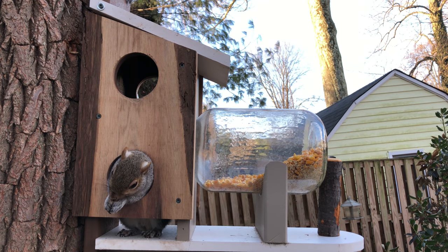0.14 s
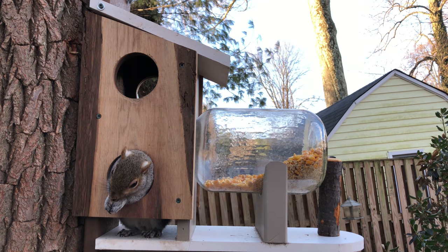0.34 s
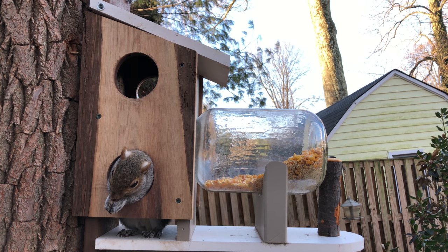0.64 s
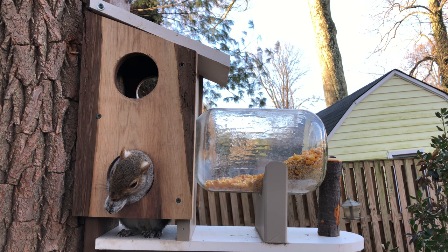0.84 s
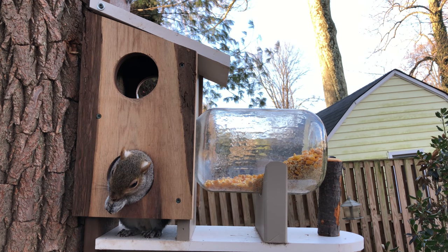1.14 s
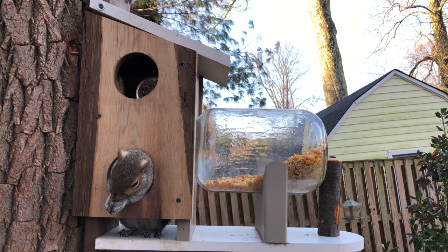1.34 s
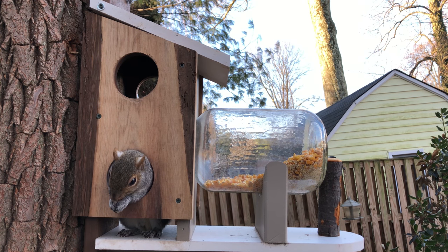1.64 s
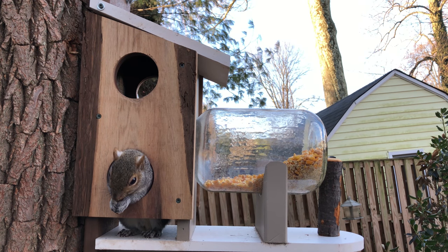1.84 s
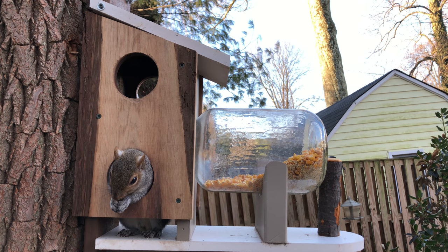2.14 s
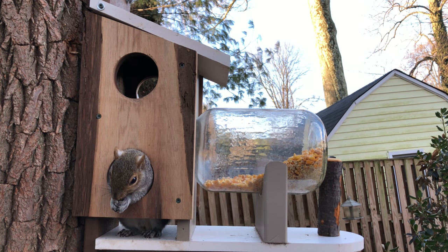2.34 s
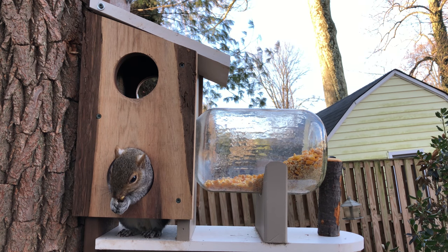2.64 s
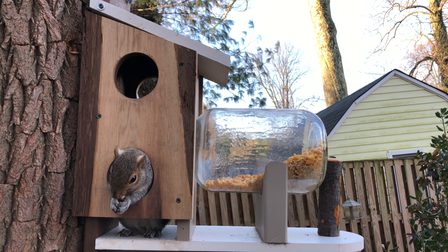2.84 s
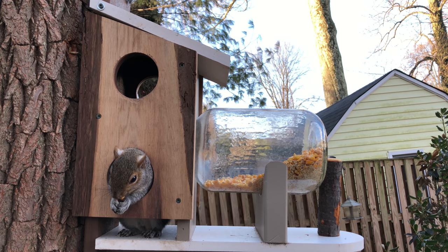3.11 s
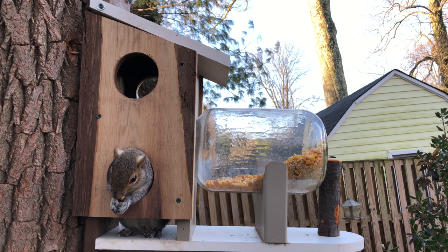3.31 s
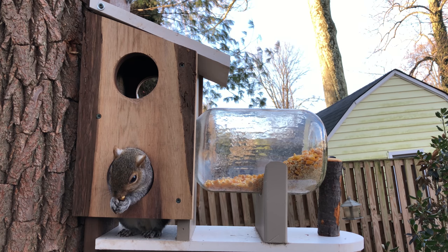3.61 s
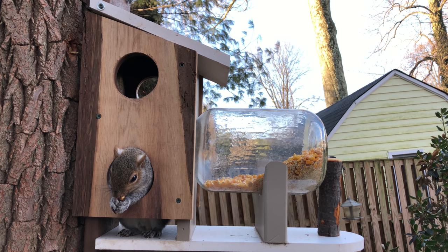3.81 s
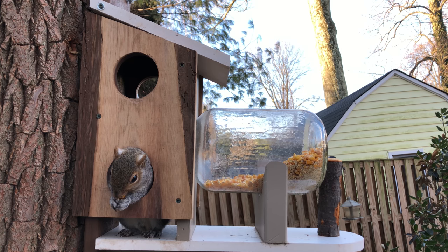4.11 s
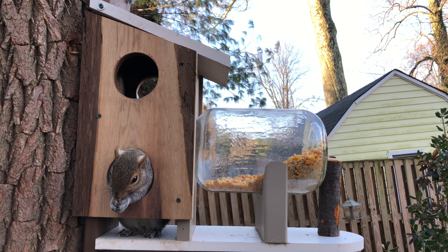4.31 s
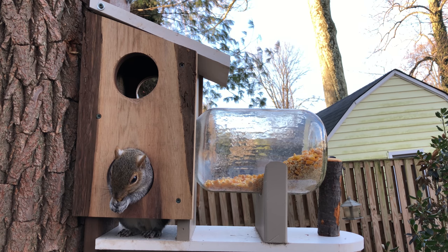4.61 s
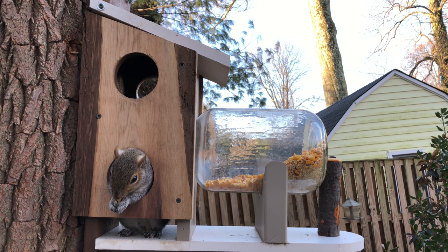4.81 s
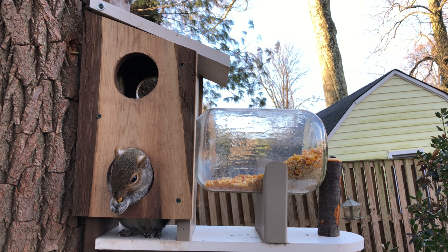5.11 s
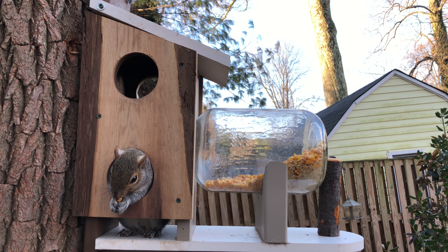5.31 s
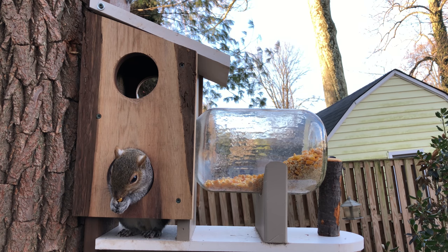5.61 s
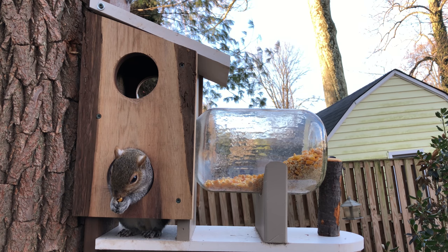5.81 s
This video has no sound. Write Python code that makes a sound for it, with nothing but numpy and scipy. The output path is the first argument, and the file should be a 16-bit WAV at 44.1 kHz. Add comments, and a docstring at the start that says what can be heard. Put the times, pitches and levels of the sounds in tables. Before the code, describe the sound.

A quiet backyard, heard with a squirrel very near the microphone gnawing dried corn at a wooden feeder. A low, fluctuating drone of a distant engine sits in soft town rumble with a thin airy hiss. From 0 to 2 s, faint small birds give rising slurs, quick chirps and thin high whistles, blurred by trees. The gnawing begins with light dry ticks and a clear crack at 0.8 s. From 1.7 to 2.5 s comes a dense burst of loud, brittle crunches, with tiny scrapes of teeth on hull. Then only faint nibbling clicks and a soft rustle remain, with a modest crack near 3.5 s and a high bird call at 3.3 s. Two sharp, isolated snaps strike at 4.4 and 4.6 s. Distant tyre noise swells towards 5 s and stays present; small ticks and a last faint buzzy bird call close at about 6 s.

```python
"""Squirrel gnawing dried corn

A squirrel gnaws dried corn close by, in the doorway of a wooden feeder in a back yard. Each bite is a
fracture: impulses ring the modes of the hard kernel and scatter off feeder, jar and trunk.
A far engine drones as a sum of multiples of its cycle; road, rumble and air are shaped noise, the road
swelling towards the end; small birds whistle in the trees as gliding sines."""
import sys
import numpy as np
from scipy import signal
from scipy.fft import rfft, irfft
from scipy.io import wavfile

SR = 44100
rng = np.random.default_rng(int(sys.argv[2]) if len(sys.argv) > 2 else 0)


def wav_out(sig):
    """Save sig, one row per channel (or a flat mono array), as 16-bit PCM at SR to the path in sys.argv[1]."""
    wavfile.write(sys.argv[1], SR, np.round(np.clip(np.atleast_2d(sig).T, -1, 1) * 32767).astype(np.int16))


N = 262395
TIME = np.arange(N) / SR  # seconds

# Noise spectra of the town rumble, the air, the road and the nearer car's tread.
# Each row: frequency in Hz, relative density in dB per Hz.
RUMBLE_SPECTRUM = [(25, -30.5), (45, 2.5), (80, 9), (140, 3), (250, -4.5), (350, -6), (500, -15.5),
                   (1000, -52)]
AIR_SPECTRUM = [(1500, 5.5), (3000, 4), (5000, 2.5), (8000, -3.5), (12500, -4), (14800, -13),
                (16000, -27.5)]
ROAD_SPECTRUM = [(200, -17), (480, 0), (800, 2), (950, -0.5), (1200, -0.5), (1800, -7), (2600, -12),
                 (3500, -19), (8000, -44)]
CAR_SPECTRUM = [(450, -27), (650, 3.5), (810, 6), (930, 3.5), (1180, 3), (1500, -6.5), (2000, -23.5),
                (2500, -7), (3200, -29.5)]
# Tyre noise from the road, and from one car that draws nearer. Each row: time in seconds, level in dB.
ROAD_LEVEL = [(0, -68), (2.6, -68), (4.4, -64), (4.92, -61), (5.3, -63.5), (5.95, -63.5)]
CAR_LEVEL = [(0, -85), (4.3, -82.5), (4.75, -66), (5.05, -65.5), (5.3, -67.5), (5.95, -63)]

# Speed of the far eight-cylinder engine. Each row: time in seconds, firing rate in Hz.
ENGINE_SPEED = [(0, 98.1), (0.3, 100.5), (0.7, 97.64), (2.7, 95.25), (3.2, 97.34), (3.5, 103.4), (4, 105.8),
                (5.2, 104.9), (5.95, 96.44)]
# Its firing tone and low exhaust throb, before a small trim. Each row: time in seconds, level in dB.
FIRING_LEVEL = [(0.0, -44.5), (0.38, -40), (1.41, -42), (1.77, -57), (1.84, -47), (2.2, -42.5), (2.67, -51),
                (2.95, -41.5), (3.18, -40), (3.83, -51), (4.01, -64), (4.11, -55), (4.99, -47.5),
                (5.15, -64), (5.29, -46), (5.44, -45.5), (5.57, -57.5), (5.95, -49.5)]
THROB_LEVEL = [(0.0, -46), (0.45, -47), (0.73, -59), (1.09, -50), (1.56, -63), (1.67, -50.5), (2.8, -58),
               (2.92, -68), (3.0, -62), (4.62, -57), (4.67, -62.5), (5.01, -49.5), (5.17, -70),
               (5.49, -48.5), (5.83, -70.5), (5.95, -58)]
# Its weaker lines. Each row: multiple of the engine cycle rate, usual level in dB.
ENGINE_ORDERS = [(10, -65.5), (11, -60), (13, -68), (14, -68.5), (16, -64), (19, -76.5), (21, -73.5),
                 (27, -83.5), (30, -81.5)]
# Course of the weaker lines about their usual level. Each row: time in seconds, change in dB.
ORDERS_LEVEL = [(0, 0), (0.75, 5), (1.9, 2), (2.3, -1), (3.5, -1.5), (5.95, -2)]

# Bird calls; levels are before the waver and the trees.
# Soft rising slurs of one bird. Each row: start in seconds, length in seconds, final pitch in Hz.
SLURS = [(0.393, 0.19, 2910), (0.605, .11, 2800), (0.936, 0.18, 2786), (1.281, 0.15, 2760),
         (1.617, .16, 2811), (1.958, 0.14, 2740)]
# Quick, rough upward chirps. Each row: start in seconds, length in seconds, level in dB, final pitch in Hz.
CHIRPS = [(0.114, 0.093, -79, 4350), (0.247, 0.064, -76, 4560), (0.52, 0.067, -81, 7326),
          (0.85, 0.061, -71, 3780), (1.081, .055, -72, 3670), (1.347, 0.1, -73, 3600),
          (2.489, 0.08, -75, 4000)]
# High buzzy calls that drop in pitch. Each row: start in seconds, length in seconds, level in dB.
SEEPS = [(1.247, 0.26, -84.5), (1.73, 0.14, -73.5), (3.275, 0.11, -75.5), (4.693, 0.026, -74),
         (5.611, 0.14, -75)]
# Thin whistles that settle on one high pitch.
# Each row: start in seconds, length in seconds, level in dB, height of the start above that pitch in Hz.
THIN_WHISTLES = [(0.0, 0.1, -74.5, 423), (0.254, 0.13, -78.5, 1110), (0.881, 0.214, -74, 70)]
# Long, slightly sagging notes of a far bird. Each row: start in seconds, length in seconds, final pitch in Hz.
HELD_NOTES = [(0.0, 0.22, 3690), (0.457, 0.49, 4120), (1.204, .36, 3850)]

# Modes that a crack rings, in four groups from dull to sharp.
# Each row: frequency in Hz, width of one resonance stage in Hz, strength in dB within its group.
BODY_MODES = [(756, 930, -8.5), (1455, 1780, -1), (2042, 1550, -3)]
RING_MODES = [(4220, 1200, -1), (4710, 770, 0.11)]
BRIGHT_MODES = [(5570, 4700, -0.62), (7540, 970, -0.078)]
TOP_MODES = [(10400, 2180, 0), (12010, 1470, -0.5), (14220, 1500, -6)]
# Soft rustles as the paws turn the kernel. Each row: centre in seconds, half length in seconds, level in dB.
RUSTLES = [(1.078, 0.029, -77), (3.562, 0.016, -76), (4.963, 0.014, -69.5)]
# Teeth scraping over the hull. Each row: start in seconds, length in seconds, level in dB.
SCRAPES = [(1.902, 0.013, -32), (2.078, 0.014, -37.5), (2.179, 0.017, -37), (2.282, 0.018, -46),
           (4.205, 0.011, -44)]
# Cracks of the kernel. Each row: time in seconds, level in dB, then the ring of the hull and the
# sharpness of the snap, both in dB about that level.
CRACKS = [(0.0784, -30, 6, -3), (0.344, -33, -8, -12), (0.6164, -36, 7.5, -2), (0.822, -15.5, -2, -11),
          (1.4233, -32, 5, -6), (1.7113, -7.5, -9.5, -12.5), (1.8164, -3.5, -15.5, -4),
          (1.8276, -8.5, -4, -0.5), (1.9043, -12.5, -8, -11), (1.91, -15, -7.5, 0.5),
          (1.9992, -8.5, -22, -12.5), (2.176, -14.5, -10, -15), (2.1806, -13.5, -18, -13),
          (2.186, -11.5, -30, -19), (2.2043, -12.5, -19, -9), (2.3229, -4, -10, -10),
          (2.328, -11.5, -4.5, -4), (2.4463, -2.5, -1.5, 2), (2.9178, -47, 5, 4), (3.1312, -38.5, 2.5, 3),
          (3.345, -39.5, 10.5, -1), (3.474, -25.5, -5, -14), (4.0449, -34.5, 7, 2), (4.1516, -43.5, 7, 15),
          (4.2041, -24, -23, -11), (4.405, 1, -4, -3), (4.6064, -1, -9, 4), (5.1067, -32.5, -4, -0.5),
          (5.3086, -40.5, 5.5, 6.5), (5.654, -39.5, 6.5, -3), (5.8176, -29, 2.5, -5)]


def from_db(db):
    """Amplitude ratio: 20 dB is a factor of ten."""
    return 10 ** (np.asarray(db) / 20)


def rms_one(x):
    """Normalisation: scale to unit rms."""
    return x / np.sqrt(np.mean(x ** 2) + 1e-20)


def curve(rows):
    """Linear interpolation: join (time, value) rows by straight lines."""
    seconds, values = np.transpose(rows)
    return np.interp(TIME, seconds, values)


def drift(rate):
    """Low-passed noise: smooth chance with about `rate` turns a second and unit spread."""
    step = 40  # samples between computed points
    pole = np.exp(-2 * np.pi * rate * step / SR)
    settle = 2000  # points dropped while the filter starts
    white = rng.standard_normal(N // step + settle + 2)
    slow = signal.lfilter([1], [1, -2 * pole, pole * pole], white)[settle:]
    return np.interp(np.arange(N) / step, np.arange(len(slow)), rms_one(slow))


def band(x, low_hz, high_hz, order=2):
    """Band limiting: a causal Butterworth band-pass."""
    edges = [low_hz, min(high_hz, 0.45 * SR)]
    sos = signal.butter(order, edges, "band", fs=SR, output="sos")
    return signal.sosfilt(sos, x + 1e-18)


def coloured_noise(spectrum):
    """Spectral shaping: steady noise of unit rms, weighted in frequency."""
    hz, db = np.transpose(spectrum)
    bins = np.maximum(np.fft.rfftfreq(N, 1 / SR), 1)
    skirt = np.minimum(bins / hz[0], 1) ** 2  # falls away below the first row
    gain = skirt * from_db(np.interp(np.log(bins), np.log(hz), db))
    return rms_one(irfft(rfft(rng.standard_normal(N)) * gain, N))


def resonance(x, hz, width_hz):
    """Damped oscillator: a two-pole resonance with gain 1 at its peak."""
    r = np.exp(-np.pi * width_hz / SR)
    numerator = [(1 - r * r) / 2, 0, (r * r - 1) / 2]
    denominator = [1, -2 * r * np.cos(2 * np.pi * hz / SR), r * r]
    return signal.lfilter(numerator, denominator, x + 1e-18)


def double_resonance(x, hz, width_hz):
    """Cascade: the same resonance twice, for steep skirts and deep valleys between modes."""
    return resonance(resonance(x, hz, width_hz), hz, width_hz)


def scatter(x, t60, delay_s, low_hz, high_hz):
    """Diffuse reflection: countless echoes start after a delay and decay 60 dB in each t60 seconds."""
    t = TIME[:SR]
    tail = rng.standard_normal(SR) * from_db(-60 * t / t60) * (t > delay_s)
    tail = tail / np.linalg.norm(tail)  # unit energy before band limiting
    return signal.fftconvolve(x, band(tail, low_hz, high_hz))[:N]


def mottle(x, depth_db, rate):
    """Turbulent fading: moving air makes half-octave bands, centred 512 Hz to 2.9 kHz, swell and fade."""
    octave = np.log2(np.maximum(np.fft.rfftfreq(N, 1 / SR), 1))
    spectrum, out = rfft(x), x
    for centre in np.arange(9, 12, 0.5):
        weight = np.maximum(1 - 2 * np.abs(octave - centre), 0)
        part = irfft(spectrum * weight, N)
        out = out + part * (from_db(depth_db * drift(rate)) - 1)
    return out


def rumble(level_db):
    """Superposition of far sources: low town noise whose level wanders slightly."""
    return from_db(level_db + 0.43 * drift(1.3)) * coloured_noise(RUMBLE_SPECTRUM)


def air(level_db):
    """Broadband noise: a thin, steady hiss of air."""
    return from_db(level_db) * coloured_noise(AIR_SPECTRUM)


def hollow(hz, width_hz, level_db):
    """Narrow-band resonance: noise through sharp poles hangs in the rumble as a faint, hollow note."""
    return from_db(level_db) * rms_one(double_resonance(rng.standard_normal(N), hz, width_hz))


def road():
    """Tyre noise: shaped noise from a road, mottled by the air on its way."""
    return from_db(curve(ROAD_LEVEL)) * mottle(coloured_noise(ROAD_SPECTRUM), depth_db=1.62, rate=21.0)


def nearer_car():
    """Tread hum: a band of tyre noise grows as one car draws nearer."""
    return from_db(curve(CAR_LEVEL)) * mottle(coloured_noise(CAR_SPECTRUM), depth_db=3.5, rate=20)


def engine(firing_trim_db, throb_trim_db, fade_db, wander):
    """Periodic excitation: eight firings a cycle; uneven pulses add multiples that fade over the distance."""
    cycle = 2 * np.pi * np.cumsum(curve(ENGINE_SPEED) / 8) / SR  # phase in radians
    firing = from_db(curve(FIRING_LEVEL) + firing_trim_db) * np.sin(8 * cycle)
    throb = from_db(curve(THROB_LEVEL) + throb_trim_db) * np.sin(5 * cycle)
    out = firing + throb
    orders_db = curve(ORDERS_LEVEL)
    for multiple, db in ENGINE_ORDERS:
        # wander in radians
        phase = multiple * cycle + wander * drift(4.16) + 2 * np.pi * rng.random()
        out += from_db(db + orders_db + fade_db * drift(1.96)) * np.sin(phase)
    return np.sqrt(2) * out  # levels count as rms


def note(start, length, db, end_hz, offset_hz, bend, warble_hz, warble):
    """Frequency modulation: a swelling sine glides from an offset to its final pitch; bend 1 is even."""
    now = np.flatnonzero((TIME >= start) & (TIME < start + length))
    u = np.linspace(0, 1, len(now))
    hz = end_hz + offset_hz * (1 - u) ** bend + warble_hz * warble[now]
    swell = np.sqrt(2 * np.abs(np.sin(np.pi * u)))
    out = np.zeros(N)
    out[now] = from_db(db) * swell * np.sin(2 * np.pi * np.cumsum(hz) / SR)
    return out


def birds(waver_db, direct_db, trees_db):
    """Direct and scattered sound: five kinds of gliding call share one waver and are blurred by the trees."""
    warble = drift(138)
    waver = from_db(waver_db * drift(49))
    calls = np.zeros(N)
    for start, length, hz in SLURS:
        calls += note(start, length, -75.5, hz, offset_hz=-370, bend=1.3, warble_hz=12, warble=warble)
    for start, length, db, hz in CHIRPS:
        calls += note(start, length, db, hz, offset_hz=-680, bend=1.1, warble_hz=162, warble=warble)
    for start, length, db in SEEPS:
        calls += note(start, length, db, 7400, offset_hz=600, bend=3.5, warble_hz=259, warble=warble)
    for start, length, db, drop_hz in THIN_WHISTLES:
        calls += note(start, length, db, 6540, offset_hz=drop_hz, bend=2.2, warble_hz=30, warble=warble)
    for start, length, hz in HELD_NOTES:
        calls += note(start, length, -79.5, hz, offset_hz=199.8, bend=2.2, warble_hz=30.5, warble=warble)
    song = waver * calls
    trees = scatter(song, t60=0.6, delay_s=0.02, low_hz=1490, high_hz=11100)
    return from_db(direct_db) * song + from_db(trees_db) * trees


def feeder(x, jar_delay_s, jar_db, near_db, spray_db, yard_db):
    """Early and late reflection: a glint off the glass jar, scatter from wood and bark, a wash from the yard."""
    jar = np.interp(TIME - jar_delay_s, TIME, band(x, 5000, 13870), left=0)
    near = scatter(x, t60=0.08, delay_s=0.0026, low_hz=910.0, high_hz=13900)
    yard = scatter(x, t60=0.55, delay_s=0.0365, low_hz=704, high_hz=6700)
    # gathered from all directions, the later scatter loses the colour of the modes and is evenly bright
    seconds, db, ring_db, snap_db = np.transpose(CRACKS)
    strength = np.mean(from_db([db, db + ring_db, db + snap_db]), axis=0)
    cracks = np.bincount((seconds * SR).astype(int), strength, N)
    spray = scatter(cracks, t60=0.18, delay_s=0.0061, low_hz=2450, high_hz=13500)
    late = from_db(spray_db) * spray + from_db(yard_db) * yard
    return x + from_db(jar_db) * jar + from_db(near_db) * near + late


def rustles(low_hz, high_hz):
    """Friction noise: fur and claws brush the hull with a brief, fine hiss."""
    touch = np.zeros(N)
    for centre, half_length, db in RUSTLES:
        touch += from_db(db) * np.exp(-((TIME - centre) / half_length) ** 2)
    return touch * rms_one(band(rng.standard_normal(N), low_hz, high_hz))


def kernel(at, levels_db, spread_db, tear_s):
    """Modal excitation: each fracture strikes every mode with chance strength, in the instant it tears."""
    out = np.zeros(N)
    for modes, level_db in zip((BODY_MODES, RING_MODES, BRIGHT_MODES, TOP_MODES), levels_db):
        for hz, width_hz, mode_db in modes:
            strength_chance, tear_chance = rng.standard_normal((2, len(at)))
            strength = from_db(level_db + mode_db + spread_db * strength_chance)
            onset = np.minimum((at + tear_s * np.abs(tear_chance)) * SR, N - 1).astype(int)
            out += double_resonance(np.bincount(onset, strength, N), hz, width_hz)
    return band(out, 280, 19700)


def crumbs(level_db, size_db, colour_db, count):
    """Random impulses: faint ticks of chewing, scattered evenly in time."""
    when, size = rng.random((2, count))
    levels_db = [level_db + size_db * size + group_db for group_db in colour_db]
    return kernel(when * N / SR, levels_db, spread_db=4.0, tear_s=0.00012)


def scrapes(slips_per_s, dulling_db):
    """Stick-slip: a tooth skids over the hull in a quick run of dull little fractures."""
    start, length, db = np.transpose(SCRAPES)
    slips = np.ceil(length * slips_per_s).astype(int)
    stroke = np.repeat(np.arange(len(start)), slips)  # the scrape each slip belongs to
    at = start[stroke] + length[stroke] * rng.random(len(stroke))
    levels_db = [db[stroke] + group_db for group_db in dulling_db]
    return kernel(at, levels_db, spread_db=2.0, tear_s=0.00047)


def bites(splinter_db, splinter_s):
    """Brittle fracture: the incisors break off a piece and a smaller splinter gives way right after."""
    seconds, db, ring_db, snap_db = np.transpose(CRACKS)
    # the low ring modes take only a share of the hull's ring
    levels_db = [db, db + 1.5 + 0.41 * ring_db, db + ring_db, db + snap_db]
    breaks = kernel(seconds, levels_db, spread_db=1.9, tear_s=0.00005)
    later = seconds + splinter_s * (0.5 + rng.random(len(seconds)))
    smaller_db = [level + splinter_db for level in levels_db]
    return breaks + kernel(later, smaller_db, spread_db=0.5, tear_s=0.00022)


def scene():
    """Linear superposition: the squirrel close by, everything else far behind it."""
    outdoors = rumble(level_db=-57) + air(level_db=-78) + road() + nearer_car()
    outdoors = outdoors + hollow(hz=254.3, width_hz=20.2, level_db=-67.0)
    drone = engine(firing_trim_db=0.07, throb_trim_db=0.4, fade_db=3.5, wander=0.8)
    song = birds(waver_db=2.5, direct_db=1.0, trees_db=-3)
    # colour and dulling: one value for each mode group, from dull to sharp
    gnawing = rustles(low_hz=4350, high_hz=13900)
    gnawing = gnawing + crumbs(level_db=-54, size_db=7, colour_db=(6.18, 6, 4.2, 5.3), count=70)
    gnawing = gnawing + scrapes(slips_per_s=750, dulling_db=(10.5, -0.5, -14.5, -6.5))
    gnawing = gnawing + bites(splinter_db=-9.0, splinter_s=0.0006)
    squirrel = feeder(gnawing, jar_delay_s=0.012, jar_db=-34.5, near_db=-19.5, spray_db=-27.0, yard_db=-32.0)
    return (outdoors + drone + song + squirrel)[None]


def record(dry):
    """Low-pass filtering: an elliptic filter cuts the top steeply above 16.4 kHz."""
    sos = signal.ellip(10, 0.1, 80, 16400, fs=SR, output="sos")  # 0.1 dB ripple, 80 dB stop band
    return signal.sosfilt(sos, dry)


dry = scene()
out = record(dry)
wav_out(out)
```